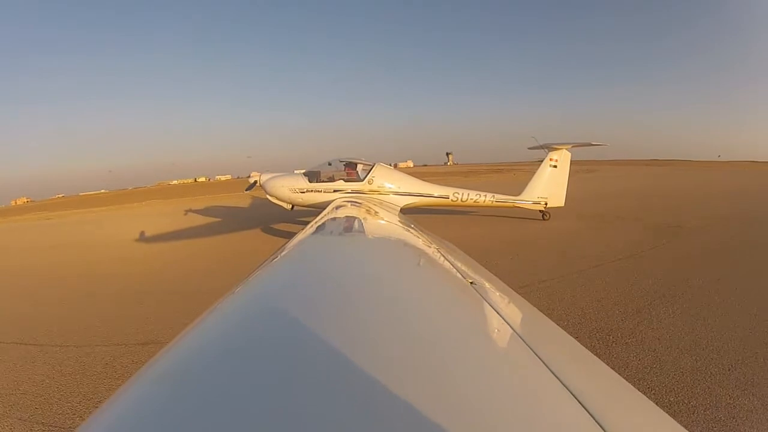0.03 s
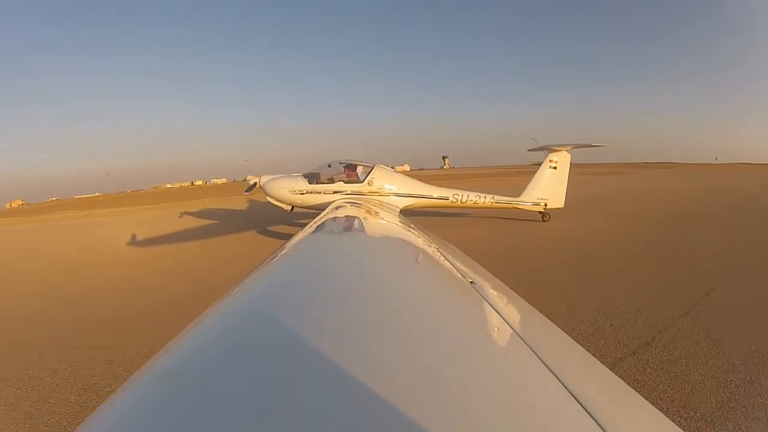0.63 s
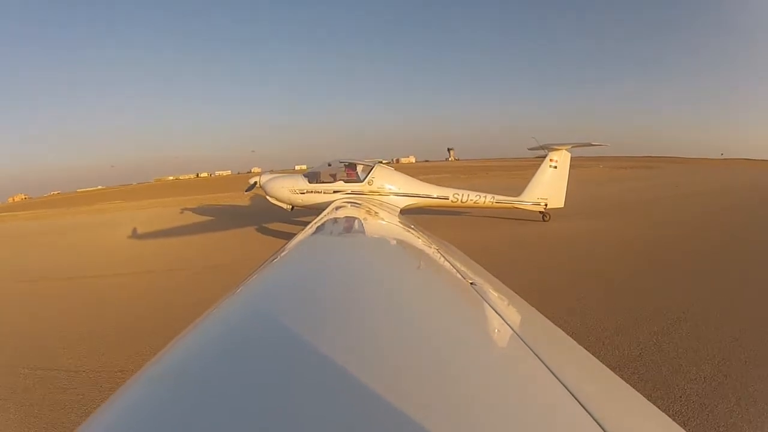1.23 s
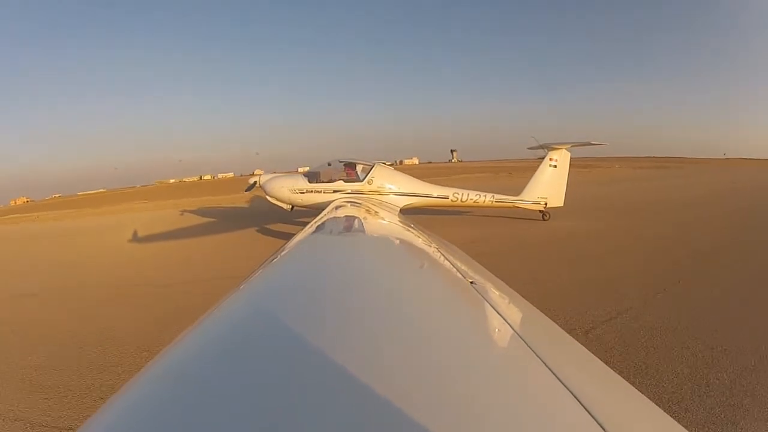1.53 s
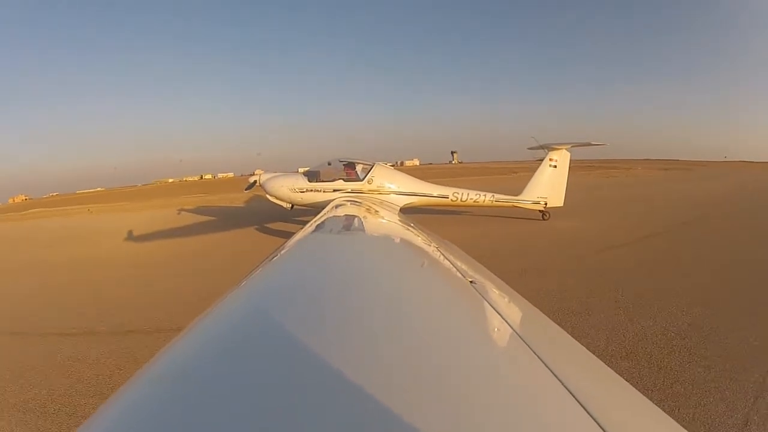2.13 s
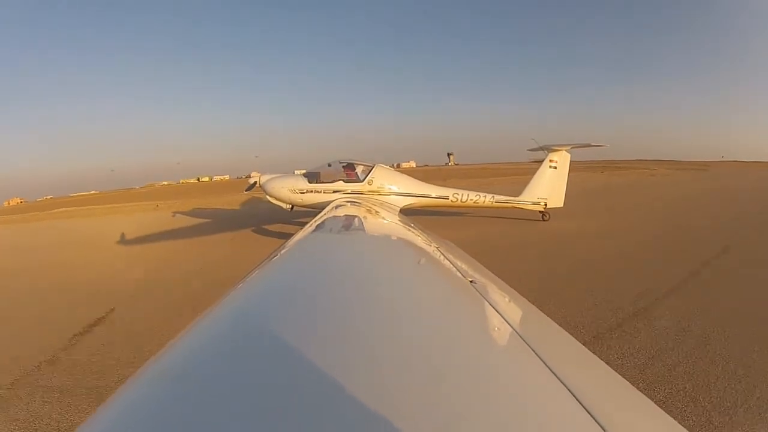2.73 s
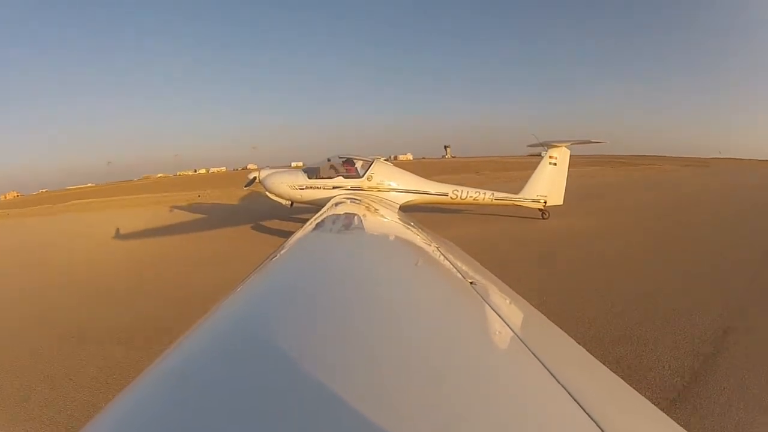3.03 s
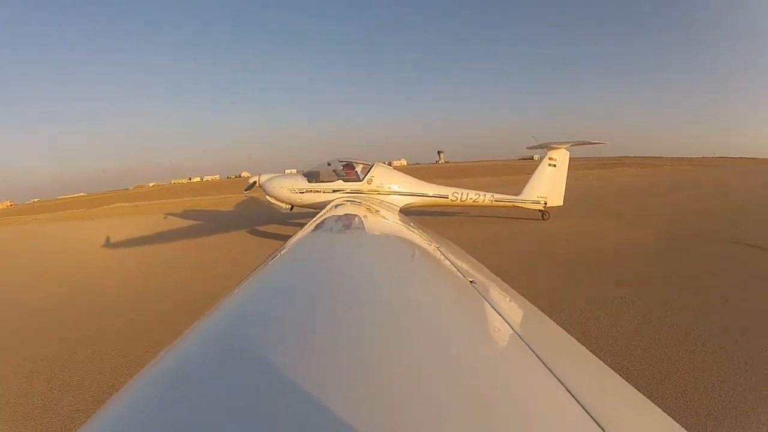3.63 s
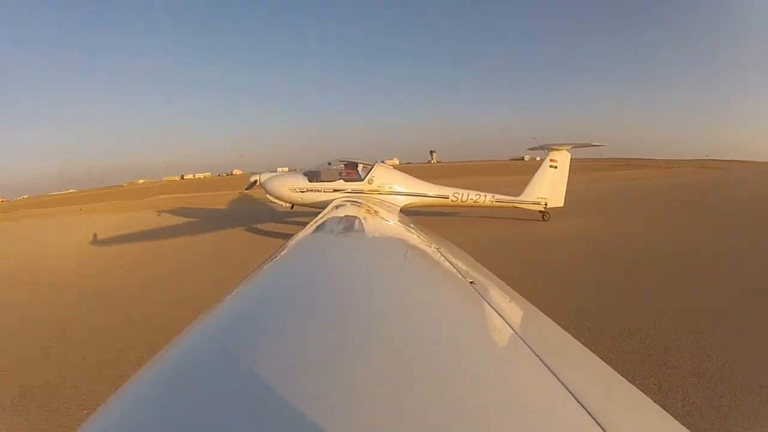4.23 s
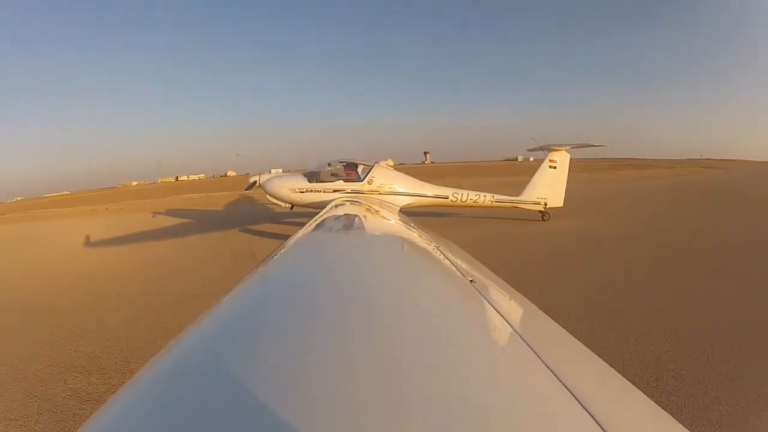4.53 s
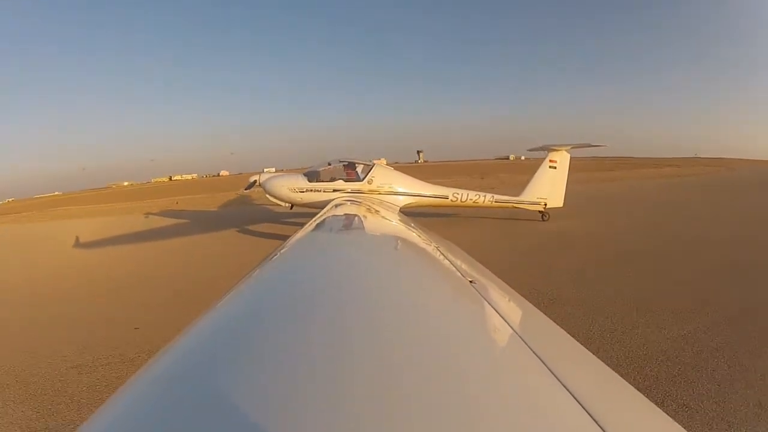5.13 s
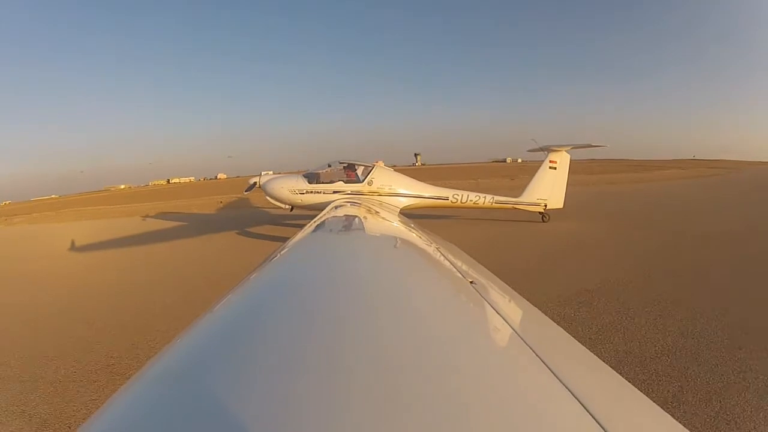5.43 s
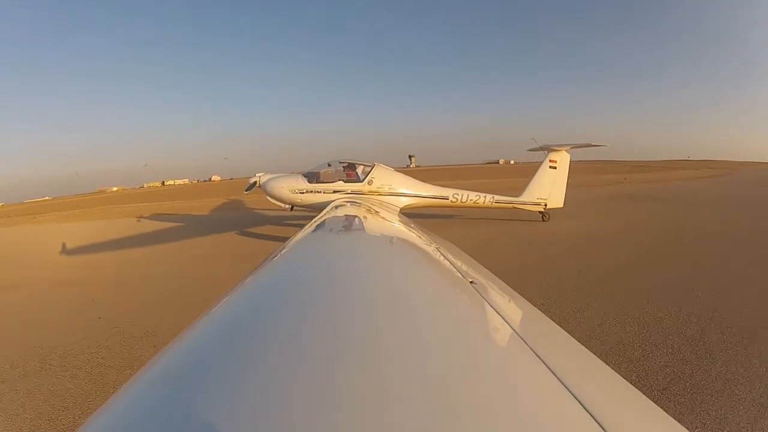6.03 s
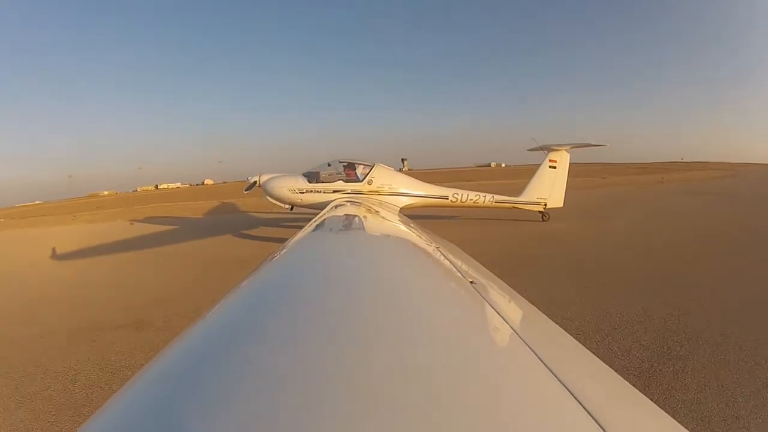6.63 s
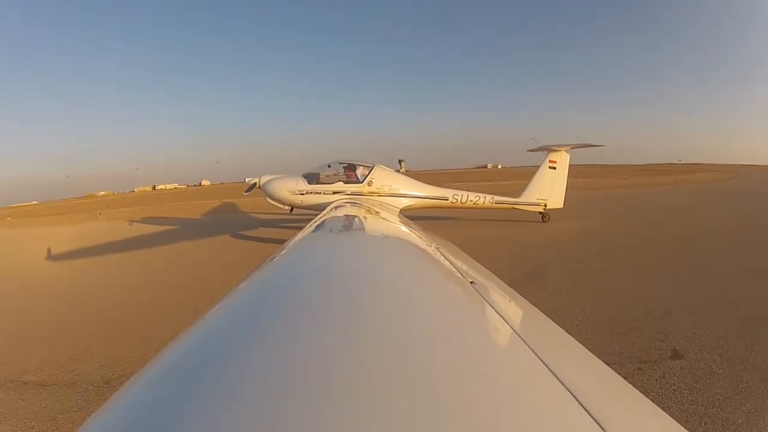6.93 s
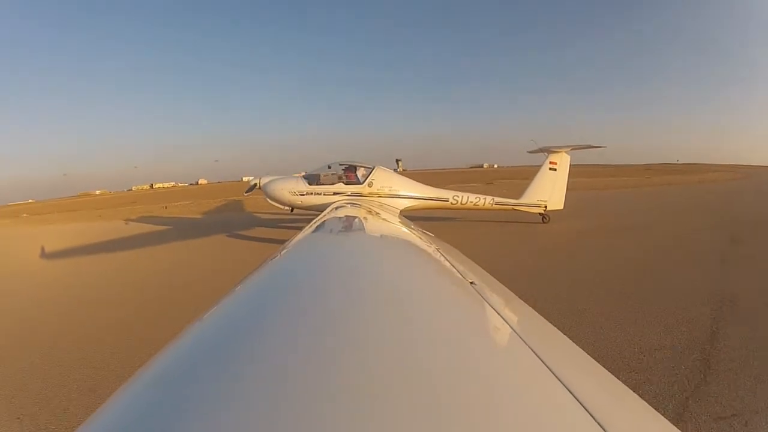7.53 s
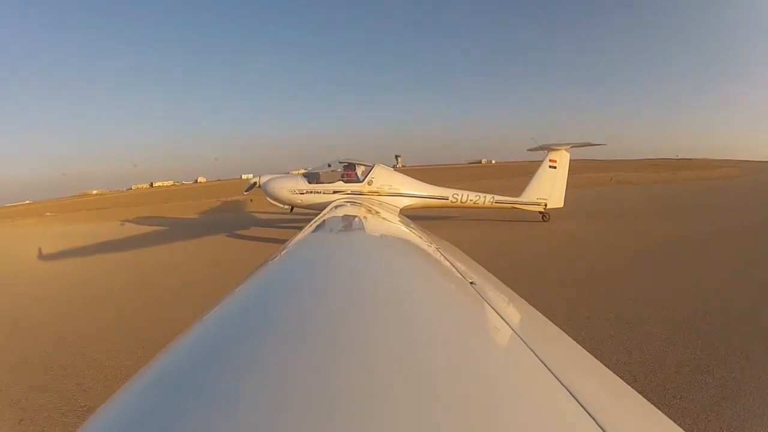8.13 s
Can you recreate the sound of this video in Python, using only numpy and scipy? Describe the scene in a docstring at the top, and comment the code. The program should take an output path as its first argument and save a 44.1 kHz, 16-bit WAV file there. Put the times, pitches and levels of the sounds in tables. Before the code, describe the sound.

A deep, uneven shudder and hollow drumming run throughout as a light aircraft rolls over asphalt in the open, with faint tyre crunch and rushing air. The microphone sits on the wing tip, so each bump swells the low shaking. Midway, the camera mount chatters in short bursts and the landing gear knocks dully. Toward the end the rolling softens slightly and hissing gusts stand out.

```python
"""A deep shudder and a hollow drumming, with hiss and rattles: a motor glider rolls out along a runway.
Heard from a small action camera on the wing tip, the wing shakes near 29 Hz, the wheels drum in the
airframe, tyres and airflow hiss, bumps rattle the camera mount and the undercarriage knocks.
The camera holds its samples at a coarse 12 kHz, which mirrors the sound into a thin treble sizzle,
and clips on the biggest shudder."""
import sys
import numpy as np
from scipy import signal
from scipy.fft import rfft, irfft
from scipy.io import wavfile
from scipy.ndimage import uniform_filter1d

SR = 44100
rng = np.random.default_rng(int(sys.argv[2]) if len(sys.argv) > 2 else 0)


def persist_wave(psi):
    """Save psi, clipped to +-1, as 16-bit WAV."""
    counts = np.round(np.clip(psi, -1, 1) * 32767).astype(np.int16)
    wavfile.write(sys.argv[1], SR, np.atleast_2d(counts).T)


N = 369558
TIME = np.arange(N) / SR


def wing_shudder(faint_hz, sag_hz):
    """A bending mode of the wing shakes the camera, almost a pure tone; bumps swell it and slow it."""
    # bumps that set the wing shuddering: (time [s], hold [s], level [dB])
    bumps = [(0.13, 0.027, -7), (0.37, 0.072, -7), (0.66, 0.072, -10.5), (0.93, 0.47, -9.5),
             (1.76, .24, -9.5), (2.7, .14, -8.5), (2.97, 0.51, -2.5), (3.7, 0.0092, -11.5),
             (3.85, .01, -7.5), (3.98, .01, -6.5), (4.1, 0.12, -9), (4.38, 0.039, -11), (4.62, 0.026, -6.5),
             (4.8, .01, -10.5), (4.92, .01, -10.5), (5.08, 0.092, -8.5), (5.33, .01, -13),
             (5.44, 0.0092, -10.5), (5.83, .01, -10), (5.98, 0.0083, -13.5), (6.37, 0.029, -10),
             (6.66, 0.037, -13.5), (7.09, 0.037, -6), (7.39, .03, -14), (7.57, 0.074, -9.5),
             (8.13, 0.041, -12.5)]
    quiver = undb(-17.5 - 0.55 * TIME + 4 * walk(9))  # between bumps, calmer as the glider slows
    swing = np.sqrt(quiver ** 2 + swells(bumps, attack_s=0.059, release_s=0.12, sag_db_per_s=7))
    # weak shudders wander off their rate, strong ones hold it
    hz = faint_hz - sag_hz * swing + walk(16) / np.sqrt(swing)
    return np.sqrt(2) * np.sin(2 * np.pi * np.cumsum(hz) / SR) * swing


def airframe_drum(soft_hz, lumps_db, trim_db):
    """Runway bumps, softened by the tyres, drum on the panels of the hollow airframe."""
    # modes of the hollow wing and fuselage: (frequency [Hz], width [Hz], level [dB])
    modes = [(53, 16, -8), (92.7, 7.6, -3), (115.8, 7.7, 1), (132.6, 6.4, 0), (161, 6.9, -3),
             (181.5, 7.4, -1), (207.8, 19, 0), (222, 9.6, -1.5), (272, 23, -31.5)]
    # the drumming, easing as the glider slows: (time [s], level [dB])
    drum_level = [(0, -19), (1.5, -18.5), (3.2, -19.5), (4.8, -18.5), (6.2, -20), (6.6, -21), (7.6, -20.5),
                  (8.38, -22.6)]
    # upper panel modes against the lower ones: (time [s], tilt [dB])
    drum_tilt = [(0, -3.5), (1.3, 1), (2.2, 2), (3.4, -2.5), (4.9, 0), (6.2, 2.5), (8.38, 6)]
    # rough patches of runway that drum harder: (time [s], hold [s], level [dB])
    patches = [(1.92, 0.23, -19.5), (2.53, 0.21, -19.5), (4.2, 0.044, -18), (5.28, 0.2, -22.5),
               (5.8, 0.056, -20), (6.07, 0.045, -21), (6.3, .05, -17), (7.08, 0.095, -20.5)]
    def panels(f):
        power = sum(abs(undb(db) * resonance(f, hz, width)) ** 2 for hz, width, db in modes)
        return np.sqrt(power / (1 + (f / soft_hz) ** 12))
    drum = filtered(grit(per_s=1500, spread_db=1.5), panels)
    drum = tilt(drum, hz=130, lift_db=curve(drum_tilt))
    levelled = drum / np.sqrt(uniform_filter1d(drum ** 2, size=SR // 6))
    roll_power = undb(curve(drum_level) + lumps_db * walk(14)) ** 2
    patch_power = swells(patches, attack_s=0.04, release_s=0.04)
    return levelled * np.sqrt(roll_power + patch_power) * undb(trim_db)


def tyre_crunch(flutter_db, trim_db):
    """Tread crunches over the coarse asphalt."""
    # tone of the tread: (frequency [Hz], spectral density [dB])
    spectrum = [(150, -1), (330, -4.5), (410, 6), (500, 0), (720, 1), (830, -4), (1130, -4.5), (1280, -9.5),
                (1600, -8), (2000, -4), (2550, -5), (2800, -15.5), (3800, -18), (5700, -23)]
    # tyres on the runway: (time [s], level [dB])
    roll_level = [(0.05, -32.5), (0.39, -35.5), (0.78, -37), (2.12, -34.5), (2.37, -37), (3.95, -35.5),
                  (4.14, -37.5), (5.61, -36.5), (5.77, -38.5), (6.78, -39), (7.13, -37.5), (7.45, -38),
                  (7.91, -41.5), (8.3, -40.5)]
    crunch = through_case(grit(per_s=5000, spread_db=1.0), spectrum)
    return crunch * undb(curve(roll_level) + flutter_db * walk(30) + trim_db)


def airflow(flutter_db, waver_db, whistle_db, trim_db):
    """Turbulent air hisses past the camera; gusts make it louder and brighter and whistle on the case."""
    # tone of the hiss: (frequency [Hz], spectral density [dB])
    spectrum = [(600, -10), (1500, -10.5), (2000, -3.5), (2550, 0.5), (2760, -1.5), (3030, 3.5), (3270, 1),
                (3420, -2.5), (3800, -2), (4130, -9), (4600, -4), (5100, -12.5), (5400, -8), (5800, -12)]
    # steady airflow, easing as the glider slows: (time [s], level [dB])
    air_level = [(0, -35.5), (.6, -36), (.8, -39.5), (2.8, -39), (3.15, -43), (3.6, -38), (4.1, -43.5),
                 (5, -42), (6.75, -44), (7.9, -43), (8.38, -43)]
    # gusts on top of it: (time [s], hold [s], level [dB])
    gusts = [(1.8, .04, -42), (2.5, 0.13, -40.5), (2.74, 0.066, -40.5), (2.94, .03, -38),
             (3.79, 0.061, -39), (4.2, 0.13, -44), (4.58, 0.19, -38.5), (5.34, 0.014, -37.5),
             (5.54, .02, -38.5), (5.66, 0.018, -42), (6.28, .03, -40), (6.4, 0.024, -38.5),
             (6.5, 0.013, -36), (6.62, 0.033, -44.5), (6.77, 0.086, -39), (6.86, 0.16, -35),
             (7.1, 0.088, -35.5), (7.25, 0.68, -36.3), (8.1, 0.16, -42)]
    steady_power = undb(curve(air_level) + waver_db * walk(12)) ** 2
    gust_power = swells(gusts, attack_s=0.025, release_s=0.062, sag_db_per_s=3)
    power = steady_power + gust_power
    gust_share = gust_power / power
    hiss = through_case(rng.standard_normal(N), spectrum)
    hiss = tilt(hiss, hz=3400, lift_db=-3 + 5.5 * gust_share)
    whistle = filtered(rng.standard_normal(N), lambda f: resonance(f, hz=3613, width=76) ** 2)
    air = hiss + undb(whistle_db) * gust_share * whistle
    return air * np.sqrt(power) * undb(flutter_db * walk(45) + trim_db)


def mount_rattles(bright_trim_db, dull_trim_db):
    """The camera mount chatters in its joint; hard contacts ring bright, soft ones dull."""
    # contacts in the joint: (time [s], bright ring [dB], dull ring [dB])
    contacts = [(3.0087, -14.5, -29), (3.0147, -23, -20), (3.0913, -22, -25), (3.1487, -20.5, -33),
                (3.1966, -23.5, -44), (3.2574, -25, -36), (3.8568, -15, -25), (3.8916, -19, -30.5),
                (3.8982, -25, -15.5), (3.9073, -11.5, -19.5), (3.9624, -11.5, -28), (4.0058, -23, -29),
                (4.0154, -25, -27), (4.024, -15.5, -23), (4.364, -21, -20.5), (4.6774, -26, -25),
                (4.7702, -23, -36), (4.8084, -22, -22.5), (4.814, -18, -28), (5.1026, -13, -28),
                (5.1175, -21, -28), (5.1317, -19, -19), (5.1409, -17, -24), (5.461, -20.5, -34)]
    # the mount's bright and dull rings: (frequency [Hz], t60 [s], level [dB])
    bright_modes = [(1320, 0.014, -5.5), (1817, 0.023, 2), (2142, 0.023, 0.5), (2400, 0.016, 1.5),
                    (2760, 0.0082, -3.5), (3720, 0.013, -10)]
    dull_modes = [(430, .025, -16), (700, .032, -2), (980, .022, -6), (1095, .048, 1)]
    out = np.zeros(N)
    for s, bright_db, dull_db in contacts:
        bright = ring(chatter(fade_s=0.0056, rebound=1.18), bright_modes)
        dull = ring(chatter(fade_s=0.0058, rebound=3.9), dull_modes)
        add(out, s, undb(bright_db + bright_trim_db) * bright)
        add(out, s, undb(dull_db + dull_trim_db) * dull)
    return out


def gear_knocks():
    """The undercarriage knocks on rough patches, muffled by the length of the wing."""
    # dull knocks: (time [s], peak level [dB])
    knocks = [(4.212, -25), (4.228, -21), (4.245, -22), (4.285, -24), (4.678, -27), (5.132, -21.5),
              (5.385, -26)]
    # ring of the undercarriage: (frequency [Hz], t60 [s], level [dB])
    modes = [(334, 0.06, -1), (424, 0.043, 5), (550, 0.027, 2), (650, 0.045, -2)]
    out = np.zeros(N)
    for s, db in knocks:
        add(out, s, undb(db) * ring(chatter(fade_s=0.022, rebound=1.0), modes))
    return out


def through_case(x, spectrum):
    """Colour x with a spectrum of (Hz, dB) points and the resonances of the camera case; rms 1."""
    # resonances of the case: (frequency [Hz], width [Hz], lift [dB])
    modes = [(1075, 107, 6), (3574, 120, 8.5)]
    hz, db = np.transpose(spectrum)
    def response(f):
        lift_db = sum(lift * abs(resonance(f, centre, width)) ** 2 for centre, width, lift in modes)
        return undb(np.interp(np.log(f), np.log(hz), db) + lift_db)
    return filtered(x, response)


def grit(per_s, spread_db):
    """Dense random contacts of uneven size."""
    touch = rng.random(N) < per_s / SR
    return touch * rng.standard_normal(N) * undb(spread_db * rng.standard_normal(N))


def chatter(fade_s, rebound):
    """One contact followed by a dying scatter of tiny rebounds."""
    t = TIME[:SR // 10]
    fade = np.exp(-t / fade_s) / np.sqrt(fade_s * SR / 2)  # unit energy
    push = rebound * unit(rng.standard_normal(len(t))) * fade
    push[0] += 1
    return push


def ring(push, modes):
    """Decaying modes of alternating polarity, driven by a push; peak 1."""
    t = TIME[:len(push)]
    tone = sum((-1) ** k * undb(db - 60 * t / t60) * np.sin(2 * np.pi * hz * t)
               for k, (hz, t60, db) in enumerate(modes))
    ringing = signal.fftconvolve(push, tone)[:len(t)]
    return ringing / np.max(abs(ringing))


def swells(rows, attack_s, release_s, sag_db_per_s=0):
    """Power envelope of events that rise, hold with an optional sag and die away."""
    power = np.zeros(N)
    for s, hold_s, db in rows:
        age = TIME - s
        rise = age / attack_s
        fall = 1 - (age - attack_s - hold_s) / release_s
        ramp = np.clip(np.minimum(rise, fall), 0, 1)
        gain = undb(db - sag_db_per_s * np.maximum(age, 0))
        power += (np.sin(ramp * np.pi / 2) ** 2 * gain) ** 2
    return power


def tilt(x, hz, lift_db):
    """Lift the part of x above hz against the part below; rms 1."""
    low = signal.sosfiltfilt(signal.butter(2, hz, fs=SR, output="sos"), x)
    gain = undb(lift_db / 2)
    return unit(low / gain + (x - low) * gain)


def resonance(f, hz, width):
    """Complex response of one mode, 1 at its centre."""
    return 1j * f * width / (hz ** 2 - f ** 2 + 1j * f * width)


def filtered(x, response):
    """Pass x through a response given as a function of frequency; rms 1."""
    f = np.maximum(np.arange(N // 2 + 1) * SR / N, 1)
    return unit(irfft(rfft(x) * response(f), N))


def walk(per_s):
    """Random drift that takes per_s steps a second; rms 1."""
    steps = rng.standard_normal(4096)
    return unit(np.interp(TIME * per_s, np.arange(len(steps)), steps))


def curve(rows):
    """Automation line through (time [s], value) points."""
    return np.interp(TIME, *np.transpose(rows))


def undb(db):
    """Decibels to gain."""
    return 10 ** (np.asarray(db) / 20)


def unit(x):
    """Scale to rms 1."""
    return x / np.sqrt(np.mean(x ** 2))


def add(out, s, x):
    """Mix x into out at time s."""
    start = int(s * SR)
    out[start:start + len(x)] += x[:N - start]


def scene():
    """Everything that reaches the camera, in one channel."""
    wing = wing_shudder(faint_hz=29.86, sag_hz=3.2)
    drum = airframe_drum(soft_hz=313, lumps_db=0.94, trim_db=0.5)
    tyres = tyre_crunch(flutter_db=0.72, trim_db=3.0)
    air = airflow(flutter_db=1.0, waver_db=1.0, whistle_db=-15.5, trim_db=1.5)
    rattles = mount_rattles(bright_trim_db=0.5, dull_trim_db=5.5)
    return (wing + drum + tyres + air + rattles + gear_knocks())[None]


def record(dry):
    """The camera keeps the band below 6 kHz, holds each sample as a step, clips, and cuts the top."""
    band_hz, hold_hz, top_hz, ceiling = 5650, 12000, 15270, 0.99
    f = np.arange(N // 2 + 1) * SR / N
    narrow = irfft(rfft(dry) / np.sqrt(1 + (f / band_hz) ** 40), N)
    # steps mirror the band to both sides of the holding rate; their flat tops weaken the bass's mirror
    mirrored = narrow * (1 + 2 * np.cos(2 * np.pi * hold_hz * TIME))
    held = irfft(rfft(mirrored) * np.sinc(f / hold_hz), N)
    top_cut = signal.ellip(12, .2, 80, top_hz, fs=SR, output="sos")
    return signal.sosfilt(top_cut, np.clip(held, -ceiling, ceiling))


dry = scene()
out = record(dry)
persist_wave(out)
```